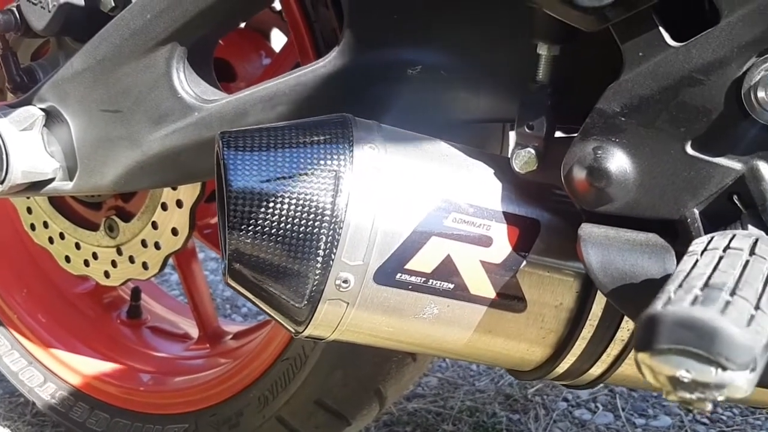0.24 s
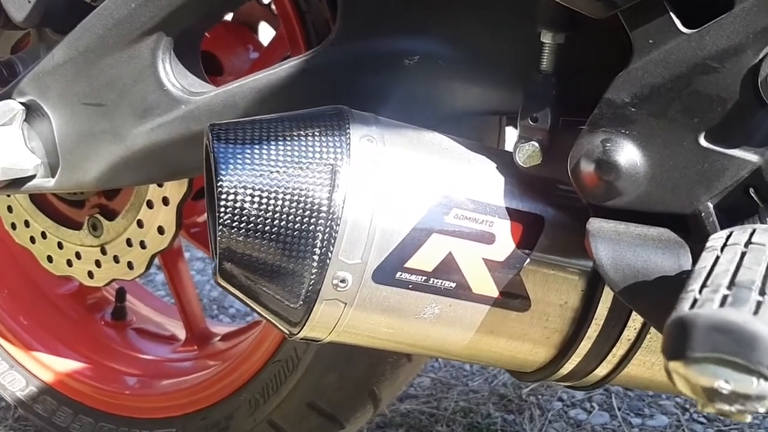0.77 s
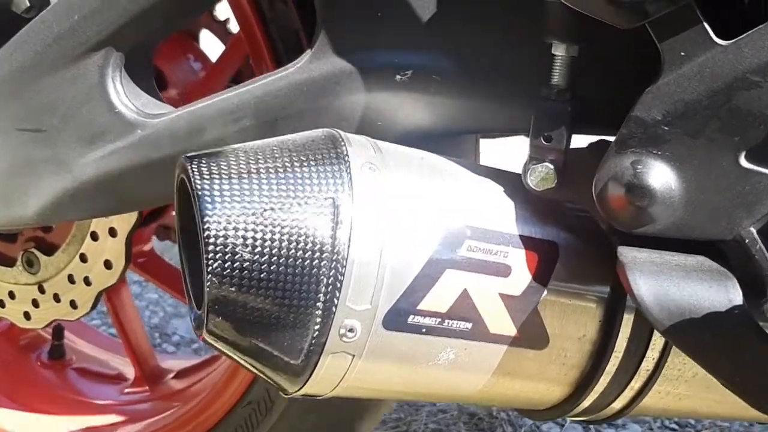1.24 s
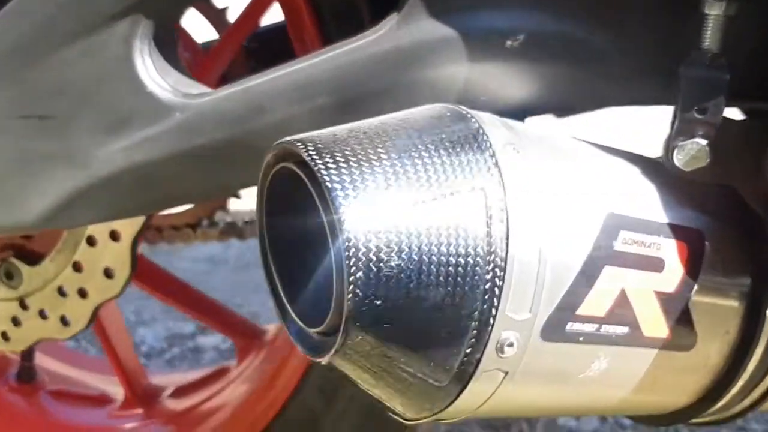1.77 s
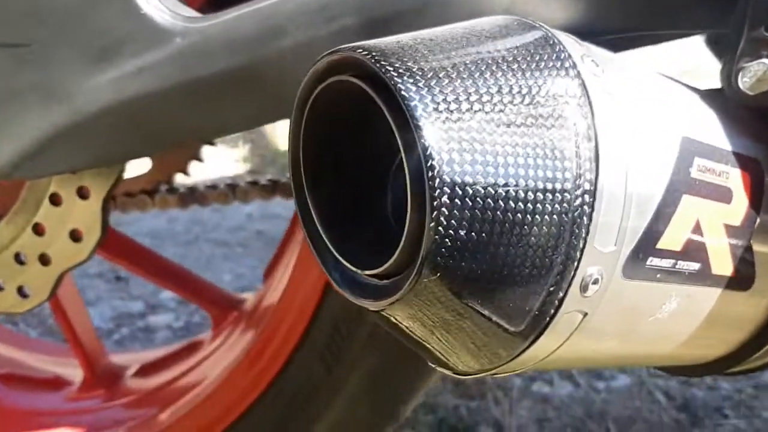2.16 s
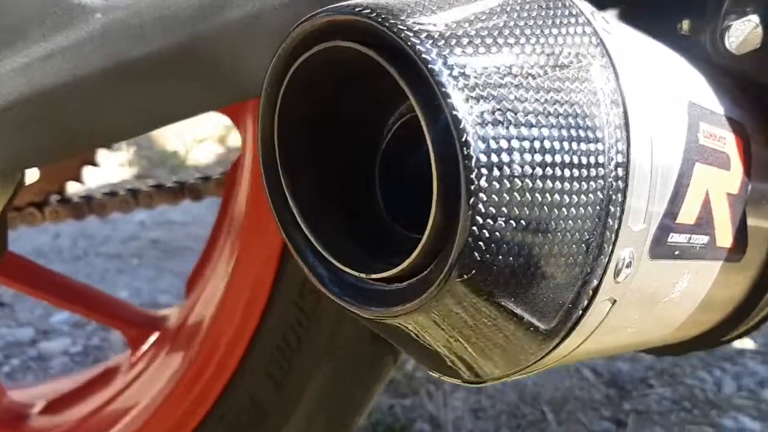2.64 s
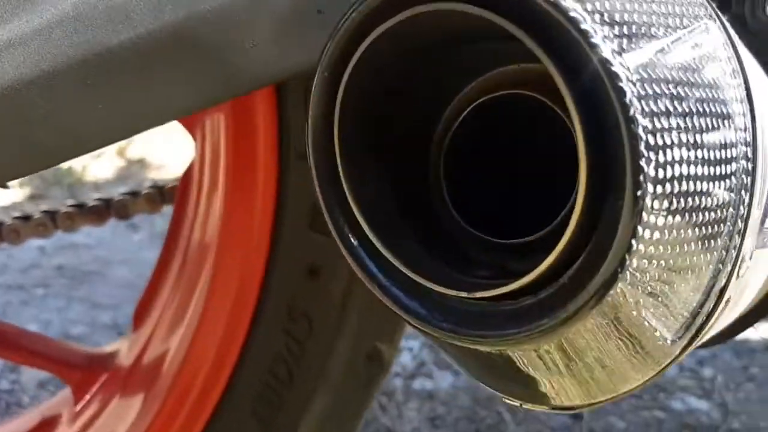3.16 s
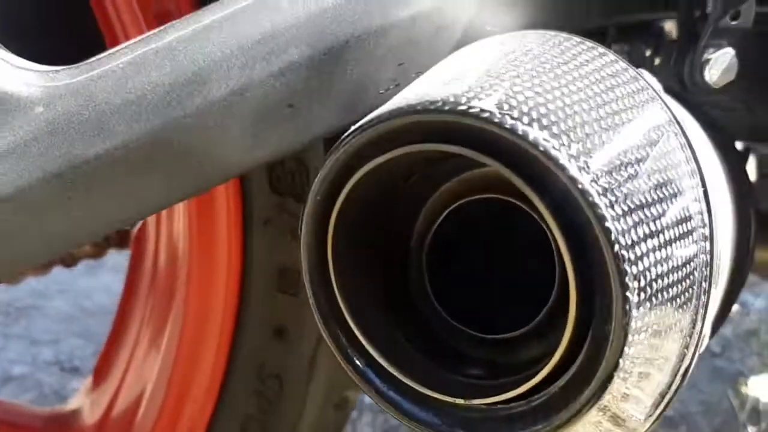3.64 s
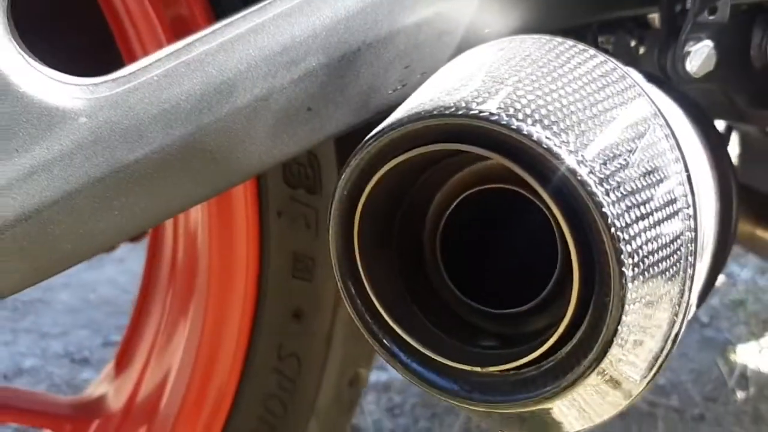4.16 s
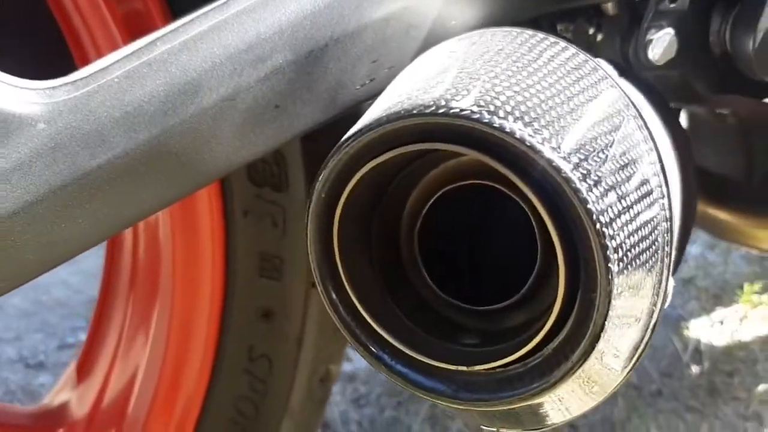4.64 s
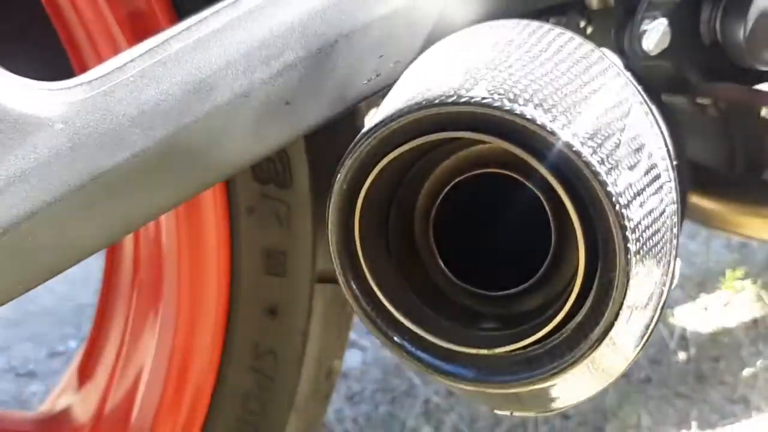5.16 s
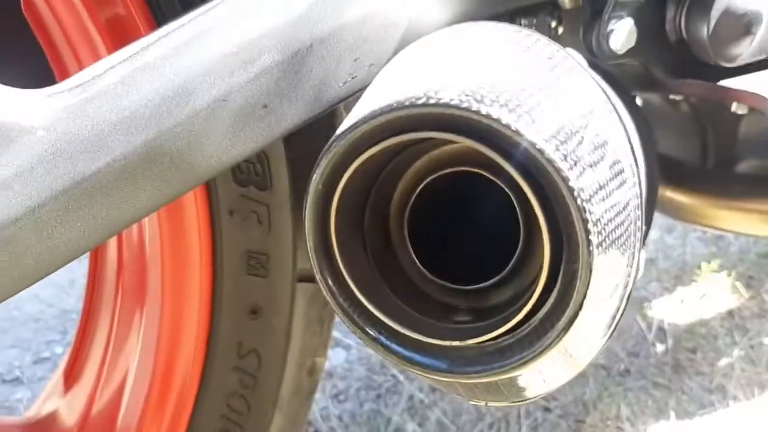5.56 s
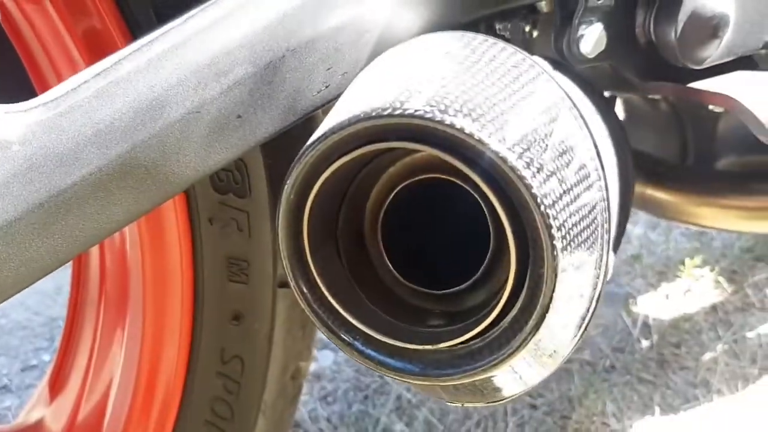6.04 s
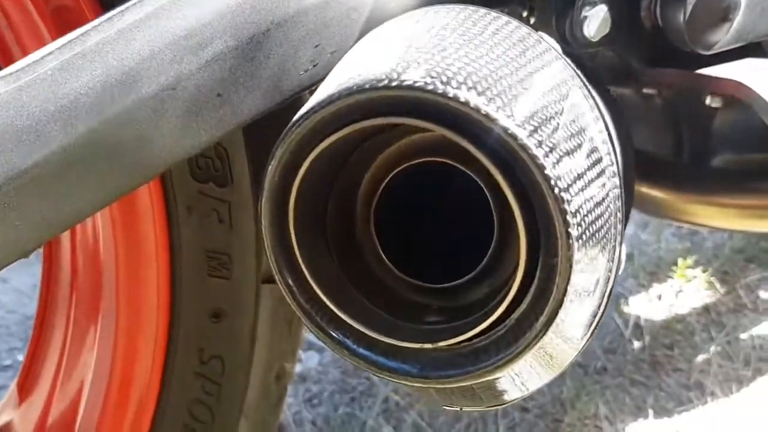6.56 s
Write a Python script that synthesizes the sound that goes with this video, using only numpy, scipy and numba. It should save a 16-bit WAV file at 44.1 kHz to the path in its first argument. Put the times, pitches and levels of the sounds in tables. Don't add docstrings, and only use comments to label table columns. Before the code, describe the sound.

A motorcycle's raspy exhaust blip falls away in uneven pops, then settles into a slow, lumpy twin-cylinder idle with close gas buffeting.

```python
import sys
import numpy as np
from scipy import signal
from scipy.fft import rfft, irfft
from scipy.io import wavfile
from scipy.ndimage import uniform_filter1d
from numba import njit

SR = 44100
rng = np.random.default_rng(int(sys.argv[2]) if len(sys.argv) > 2 else 0)


def gain_from_db(level_db):
    decades = np.asarray(level_db, float) / 20
    return 10 ** decades


def dump(signal):
    limited = np.clip(np.atleast_2d(signal).T, -1, 1)
    pcm = np.round(limited * 32767).astype(np.int16)
    wavfile.write(sys.argv[1], SR, pcm)


N = 299880
T = np.arange(N) / SR


def unit_rms(x):
    return x / np.sqrt(np.mean(x ** 2))


def even(x, span_s=.3):
    k = int(span_s * SR)
    power = uniform_filter1d(uniform_filter1d(x ** 2, k), k)
    return x / np.sqrt(power + 1e-12)


def curves(table):
    s, *columns = np.transpose(table)
    return [np.interp(T, s, c) for c in columns]


def late(x, ms):
    return np.interp(T - ms / 1000, T, x)


def noise(spectrum, channels=1):
    hz, db = np.transpose(spectrum)
    f = np.arange(N // 2 + 1) * SR / N + 1
    gain = gain_from_db(np.interp(np.log(f), np.log(hz), db, left=-90))
    return unit_rms(irfft(rfft(rng.standard_normal((channels, N))) * gain, N))


def butter(x, order, hz, kind):
    return signal.sosfilt(signal.butter(order, hz, kind, fs=SR, output="sos"), x)


@njit
def svf(x, hz, width):
    y, b, l = np.empty(len(x)), 0., 0.
    for i in range(len(x)):
        g = np.tan(np.pi * hz[i] / SR)
        v = (b + g * (x[i] - l)) / (1 + g * (g + width[i] / hz[i]))
        b, l, y[i] = 2 * v - b, l + 2 * g * v, v
    return y


def band(x, hz, width):
    return svf(x, hz + 0 * T, width + 0 * T) * width / hz


def ring(push, modes, damping=1):
    return sum(gain_from_db(db) * w / hz * svf(push, hz + 0 * T, w * damping + 0 * T) for hz, w, db in modes)


def puff(since, start, rise, fall):
    age = np.maximum(since - start, 0)
    return (1 - np.exp(-age / rise)) * np.exp(-age / fall)


def eddy(age, hz, turn):
    return np.exp(-(age / 0.0029) ** 2) * np.cos(2 * np.pi * hz * age + turn)


# time in seconds, speed in engine cycles per second.
CRANK_SPEED = [(0.0, 65.821), (0.13, 79.35), (0.23, 83.201), (0.62, 62.653), (0.94, 48.027), (1.34, 33.475),
               (2.1, 15.491), (2.35, 11.691), (3.26, 11.654), (3.36, 11.188), (3.84, 11.692),
               (4.16, 11.038), (4.48, 11.23), (4.82, 10.734), (4.98, 11.214), (5.5, 11.295), (5.8, 10.781),
               (6.8, 10.933)]


def crank():
    start_cycle, second_firing = .737, .371
    short_header_s = .0003
    held_back_s, held_speed, held_width = 0.00071, 53, 7.8
    speed = curves(CRANK_SPEED)[0]
    cycles = start_cycle + np.cumsum(speed) / SR
    marks = (np.arange(200)[:, None] + [0, second_firing]).ravel()
    fired_s = np.interp(marks, cycles, T) - np.tile([0, short_header_s], 200)
    second_speed = np.interp(fired_s, T, speed)[1::2]
    fired_s[1::2] += held_back_s * np.exp(-((second_speed - held_speed) / held_width) ** 2)
    lean_s = .0006 * np.exp(-((fired_s - 1.75) / .45) ** 2)
    snap_s = .0007 * (fired_s < .14)
    fired_s += (lean_s + snap_s) * rng.standard_normal(400)
    last = np.maximum(np.searchsorted(fired_s, T) - 1, 0)
    return speed, cycles, last, T - fired_s[last], cycles - marks[last]


# time in seconds, share of idle fuelling.
FUELLING = [
    (0, 0),
    (2.05, 0),
    (2.07, 1),
    (2.135, 1),
    (2.14, 0),
    (2.157, 0),
    (2.165, 1),
    (6.8, 1),
]


def fuelling():
    return curves(FUELLING)[0]


# frequency in Hz, width in Hz, level in dB.
BOOM_MODES = [(127, 17.1, -10.5)]
IDLE_BARK_MODES = [(338.5, 31, 4.5), (411, 80, 0), (850, 120, -1.5)]
OVERRUN_BARK_MODES = [(345, 27, -1), (514, 39, 2), (840, 120, -11)]
SLOW_MODES = [(216, 39, 0)]
# frequency in Hz, width in Hz, level in dB.
KNOCK_MODES = [(690, 180, 1.5), (990, 120, 5), (1520, 220, 6), (2560, 120, -11), (3560, 330, -23)]


def pipe(speed, last, since_s, since_cycle, idle, linger):
    scatter_db = .7 + .3 * idle + 2 * (1 - idle) * np.clip((45 - speed) / 20, 0, 1)
    second_db = 0.5 * (2 - idle) * (last % 2)
    size = gain_from_db(scatter_db * rng.standard_normal(400)[last] + second_db)
    push = size * np.exp(-since_s / .0004) * since_s

    shut = np.clip((since_cycle - .27) / 0.06, 0, 1) * idle
    boom_damping = 1 + 2.4 * (1 - idle) + 9 * shut * (1 - linger)
    boom = late(ring(push, BOOM_MODES, boom_damping), 2.5)
    boom = signal.sosfiltfilt(signal.butter(2, 75, "high", fs=SR, output="sos"), boom)

    hz = 500 * (speed / 72) ** 0.79
    pop = late(svf(svf(push, hz, .8 * hz), hz, .8 * hz), -.6 - 500 / hz)
    pop = pop + 0.1 * late(pop, 7.72)
    roar = noise([(45, 14), (110, -31.0), (200, 8.0), (400, 2), (600, -4.0), (1200, -37), (16000, -80)])[0]
    overrun = 0.41 * roar + even(pop) + 0.5 * even(late(ring(push, OVERRUN_BARK_MODES), -1.69))
    slow = np.clip((63 - speed) / 10, 0, 1) * np.clip((speed - 22) / 10, 0, 1)
    overrun = overrun + .5 * slow * even(ring(push, SLOW_MODES))
    knock = even(late(ring(np.diff(push, prepend=0), KNOCK_MODES), 1.45))
    overrun = overrun + .5 * (50 / speed) ** .6 * knock
    overrun = overrun - speed / 85 * band(overrun, 55, 90)

    soft = butter(push, 2, 650, "low")
    idle_bark = even(late(ring(soft, IDLE_BARK_MODES, 1 + shut), -3.0))
    return even(boom), idle * idle_bark + (1 - idle) * even(overrun)


# frequency in Hz, spectral level in dB per Hz.
IDLE_HISS = [(410, 8), (700, -6), (863, 5.5), (946, 0), (1460, -11.5), (1680, 1), (1840, -17), (2430, -16),
             (3070, -14.5), (3640, -20), (5260, -14), (6400, -15.5), (7110, -32.5), (14600, -29),
             (16000, -37)]
OVERRUN_HISS = [(410, 0), (700, 0.5), (875, -7), (946, -4), (1330, -7), (1540, -5), (2080, -7.5),
                (2590, -4.5), (3370, -12), (5330, -10.5), (6650, -10), (7690, -20), (9600, -21),
                (15000, -25), (16000, -32)]
# frequency in Hz, width in Hz, level in dB.
END_CAP_MODES = [(844, 115, 14), (1510, 67, -1.5), (2540, 123, -3.5), (5250, 260, -4.5)]
RASP_MODES = [(880, 64, 13.5), (1270, 260, -26), (1680, 160, 2), (2640, 110, -35), (5090, 130, 1)]


def gas(speed, last, since_s, idle, boom, top_db):
    size = gain_from_db(np.array([2.5, 3.0]) * rng.standard_normal((400, 2)))[last].T
    blow = size[0] * puff(since_s * np.sqrt(speed / 20), 0, 0.0035, 0.0068) ** 2
    burst = 0.067 + 0.86 * (speed / 45) ** 2.36 + 14 * late(blow, -1.54)
    tick = puff(since_s, np.where(last % 2, .0005, .004), .0015, .0035)
    outflow = np.maximum(-late(boom, 0.99), 0) ** 0.81
    flow = size[0] * outflow + 5.3 * size[1] * tick + 0.25
    envelope = idle * even(flow) + (1 - idle) * even(burst)

    colour = idle * noise(IDLE_HISS, channels=3) + (1 - idle) * noise(OVERRUN_HISS, channels=3)
    top = butter(colour, 4, 8000, "high")
    top_db = top_db + 8.5 + 5.1 * idle + 2.7 * (-1.5 - idle) * (speed / 60 - 2.2)
    colour = colour + top * (envelope ** -.25 * gain_from_db(top_db) - 1)
    song = unit_rms(ring(rng.standard_normal(N), END_CAP_MODES))
    colour = colour + 2.28 * (1 - speed / 90) ** 2.02 * (1 - idle) * song

    patches = gain_from_db(5.0 * unit_rms(band(rng.standard_normal(N), 90, 150)))
    strokes = even(size[1] * patches * puff(since_s, 0.007, 0.011, 0.014))
    rasp = strokes * unit_rms(ring(rng.standard_normal(N), RASP_MODES))
    return envelope * colour[0] + 0.75 * idle * rasp, envelope * colour[1:]


# place in the engine cycle as a fraction, level in dB.
VALVE_TICKS = [
    (.09, -35),
    (0.199, 0),
    (.41, 2),
    (0.488, -9),
    (0.722, -2.5),
    (0.912, -3.5),
]
# frequency in Hz, width in Hz, level in dB.
HEAD_MODES = [(1606, 89, 8.5), (2685, 220, 4.5), (3900, 550, 2.5), (5030, 133, -26)]


def valves(cycles):
    ticks = sum(gain_from_db(db) * np.diff(np.floor(cycles - place), prepend=0) for place, db in VALVE_TICKS)
    return even(ring(ticks * gain_from_db(0.5 * rng.standard_normal(N)), HEAD_MODES))


# frequency in Hz, spectral level in dB per Hz.
CASING_HUM = [(24, -38.5), (40, -33), (124, 2.5), (237, -41), (320, 13), (646, -20), (873, -42), (1680, -8),
              (2440, -12), (5180, -15.5), (16000, -40)]


def casing():
    return gain_from_db(-38) * noise(CASING_HUM, channels=2)


def buffet(last, since_s, deep):
    ragged = [(200, 15), (500, 8.5), (1000, -0.5), (2000, -6), (4000, -16.5), (16000, -44.0)]  # (Hz, dB)
    out = np.zeros((2, N))
    for port in out:
        arrive, size, hz, edge = rng.random((400, 4))[last].T
        age = since_s - .018 - 0.00804 * arrive
        thud = eddy(age, 125 + 90 * hz, 2.0 * (edge - .5)) + deep * eddy(.5 * age, 190, 0)
        rag = puff(age, -0.0029, 0.00067, 0.0055) * noise(ragged)[0]
        port += even(gain_from_db(19.2 * size) * (thud + 1.03 * edge * rag), span_s=0.14)
    return out


# time in seconds, peak in dB.
GAS_SLAPS = [
    (3.018, -29),
    (3.1936, -11),
    (3.3539, -12),
    (3.5113, -17),
    (3.6009, -9.5),
    (3.6326, -12),
    (3.81, -8),
]
# time in seconds, peak in dB, swirl frequency in Hz.
STRONG_EDDIES = [(4.122, 2, 318), (4.157, -17, 230), (4.512, -1.5, 260), (4.692, 0, 236), (4.881, 0, 212),
                 (5.149, -5, 207), (5.204, -2, 305), (5.239, 1, 340), (5.49, 0, 340), (5.682, 2.5, 236),
                 (5.74, 5.5, 300), (5.776, 4.5, 330), (6.662, 1.5, 274), (6.746, -2.5, 260),
                 (6.777, -2, 228)]


def slaps():
    crack_colour = [(200, 20.0), (700, 5.0), (2500, -7.5), (6500, -21.5), (8000, -42), (10000, -24),
                    (16000, -34)]
    envelope = sum(gain_from_db(db) * puff(T, s, 0.00021, 0.0027) for s, db in GAS_SLAPS)
    cracks = 3.3 * envelope * noise(crack_colour)[0]
    return cracks + 0.61 * sum(gain_from_db(db) * eddy(T - s - .005, hz, 0) for s, db, hz in STRONG_EDDIES)


OVERRUN_LEVELS = [-16, -12, -25, -5.5]
RISE_PER_OCTAVE = [0.033, 6.3, 7.46, 2.8]
OPEN_THROTTLE_EXTRA = [-20.5, -8, 4, -1]
IDLE_LEVELS = [-24.5, -28.5, -39.5, -25]


def exhaust_levels(speed, idle, near_db, axis):
    middle_speed, sizzle_speed = 42.9, 55.4
    throttle_shuts_s, shutting_s, hiss_settles_s = .13, .03, 0.22
    column = lambda v: np.array(v)[:, None]
    octaves = np.log2(speed / middle_speed)
    throttle = np.clip(1 - (T - throttle_shuts_s) / shutting_s, 0, 1)
    overrun = column(OVERRUN_LEVELS) + column(RISE_PER_OCTAVE) * octaves
    overrun = overrun + column(OPEN_THROTTLE_EXTRA) * throttle
    boom, bark, hiss, top = idle * column(IDLE_LEVELS) + (1 - idle) * overrun
    boom = boom - 6 * (1 - idle) * octaves ** 2 + 13.5 * axis + 0.39 * near_db
    top = top + 2 * np.exp(-(np.log2(speed / sizzle_speed) / 0.42) ** 2)
    hiss = hiss + 4.5 * np.exp(-np.maximum(T - throttle_shuts_s, 0) / hiss_settles_s)
    return boom, bark + near_db, hiss + 1.29 * near_db, top


# time in seconds, right port lag in ms, left minus right in dB,
# gust on the left port in dB, nearness to the mouth in dB.
PHONE_PATH = [(0, 0.36, 0.7, -50, -2), (0.9, 0.36, 0, -26, -1.5), (1.3, 0.352, -0.5, -33, 0.5),
              (2.0, 0.33, -0.5, -29, 2.5), (2.3, 0.25, -0.5, -30, -1.5), (2.6, 0.2, 0.5, -25.5, 1),
              (3.0, 0.13, 2.5, -12, 3), (3.45, 0.14, 4, -10, 1), (3.9, 0.16, 1, -14, 1),
              (4.2, 0.22, 0, -19.5, 0.5), (4.6, 0.23, -1, -22, 1.5), (5.0, 0.22, 0, -18.5, 2.5),
              (5.7, 0.21, -1, -16.5, 5), (6.2, 0.22, 0.5, -22.5, 4), (6.5, 0.33, -1, -16.5, 4),
              (6.8, 0.37, 5, -16.5, 7)]
# time in seconds, change in dB.
ODD_BLOWDOWNS = [
    (0.06, 2.5),
    (0.18, -1),
    (1.592, -2.5),
    (1.69, 1.5),
    (1.712, -7),
    (1.775, -0.5),
    (1.865, -4),
    (1.885, -1.5),
    (1.913, -3.5),
    (2.212, 5.5),
]
GUST_LULLS = [2.94, 3.43, 4.31, 4.972, 5.152, 6.375]


def phone_path():
    lag_ms, pan_db, gust_db, near_db = curves(PHONE_PATH)
    near_db = near_db + sum(db * np.exp(-((T - s) / 0.013) ** 2) for s, db in ODD_BLOWDOWNS)
    gust_db = gust_db + sum(-6.5 * np.exp(-((T - s) / 0.021) ** 2) for s in GUST_LULLS)
    return lag_ms, pan_db, gust_db, near_db


def at_ports(direct, scattered, lag_ms):
    low = band(direct, 450, 500)
    left = direct + 0.24 * band(direct, 340, 200)
    right = late(direct - low, lag_ms) + late(low, 0.62 * lag_ms)
    return np.array([left, right]) + 0.78 * scattered


def scene():
    off_axis_lag_ms, on_axis_lag_ms = 0.22, 0.097
    leaves_jet_s, leaving_s = 3.88, 0.28
    shelter_db = -9
    speed, cycles, last, since_s, since_cycle = crank()
    idle = fuelling()
    lag_ms, pan_db, gust_db, near_db = phone_path()
    axis = np.clip((off_axis_lag_ms - lag_ms) / (off_axis_lag_ms - on_axis_lag_ms), 0, 1)
    linger = np.clip(1 - (T - leaves_jet_s) / leaving_s, 0.03, 1)

    boom_db, bark_db, hiss_db, top_db = exhaust_levels(speed, idle, near_db, axis)
    boom, bark = pipe(speed, last, since_s, since_cycle, idle, linger)
    hiss, scattered = gas(speed, last, since_s, idle, boom, top_db)
    hiss = 0.61 * hiss + 1.16 * (speed / 80) ** 0.79 * valves(cycles)
    direct = gain_from_db(boom_db) * boom + gain_from_db(bark_db - 3.0) * bark + gain_from_db(hiss_db) * hiss
    scattered = gain_from_db(hiss_db + 8.5) * butter(scattered, 1, 830, "high")
    ports = at_ports(direct, scattered, lag_ms) * gain_from_db(np.array([pan_db, -pan_db]) / 2)

    gusts = gain_from_db(np.array([gust_db, gust_db + shelter_db])) * buffet(last, since_s, 0.62 * linger)
    gusts = gusts + 0.21 * gusts[0] * [[0], [1]] * gain_from_db(shelter_db)
    return ports + gusts + slaps() * [[1], [.15]] + casing()


def top_cut(x):
    return signal.sosfilt(signal.butter(12, 16220, fs=SR, output="sos"), x)


def record(dry):
    x = butter(dry, 3, 48, "high")
    x = x / (1 + (x / 1.35) ** 4) ** .25
    x = signal.sosfilt(signal.ellip(8, .2, 60, 16080, fs=SR, output="sos"), x)
    return top_cut(np.clip(x, -1, 1))


dry = scene()
out = record(dry)
dump(out)
```